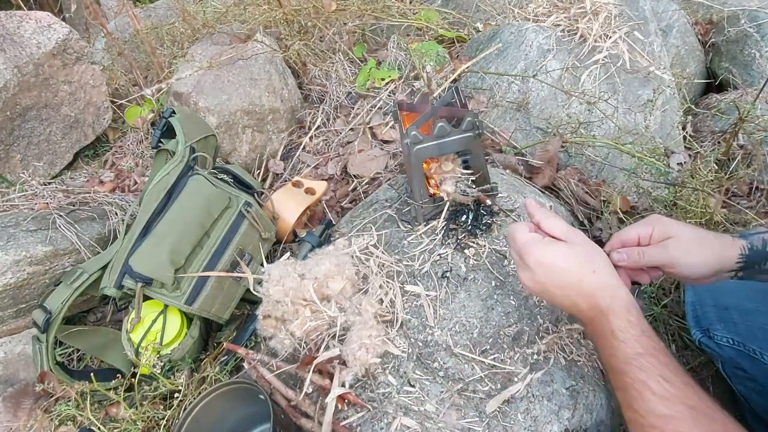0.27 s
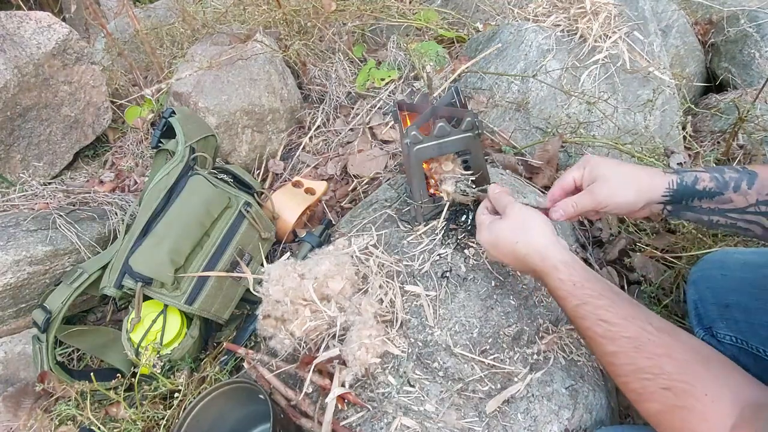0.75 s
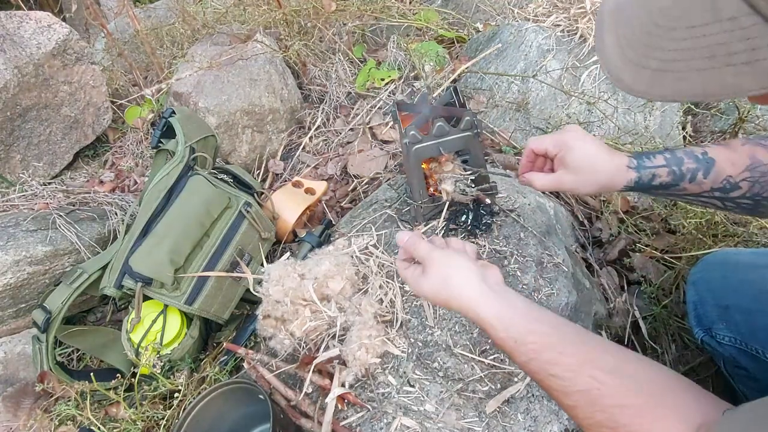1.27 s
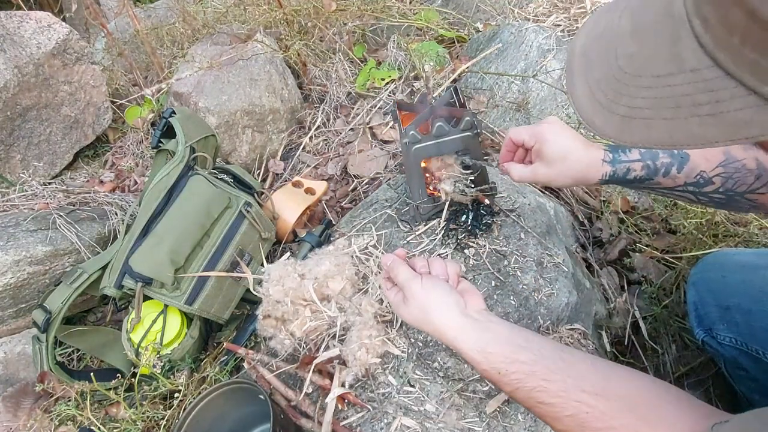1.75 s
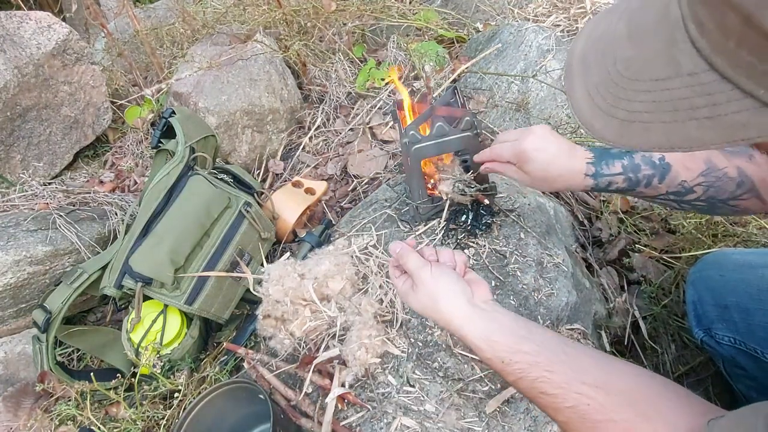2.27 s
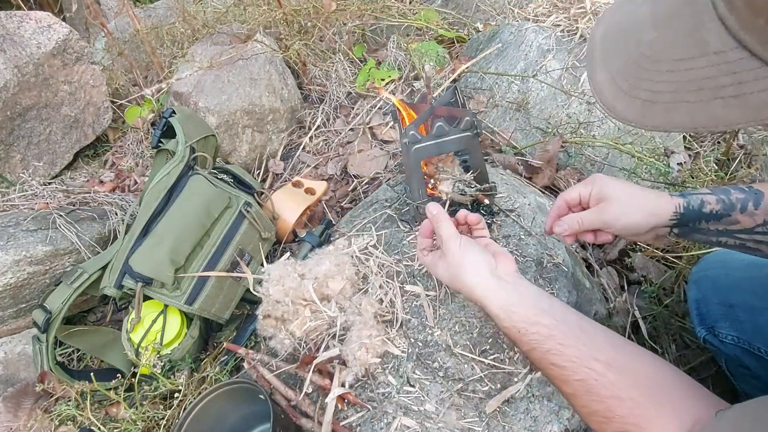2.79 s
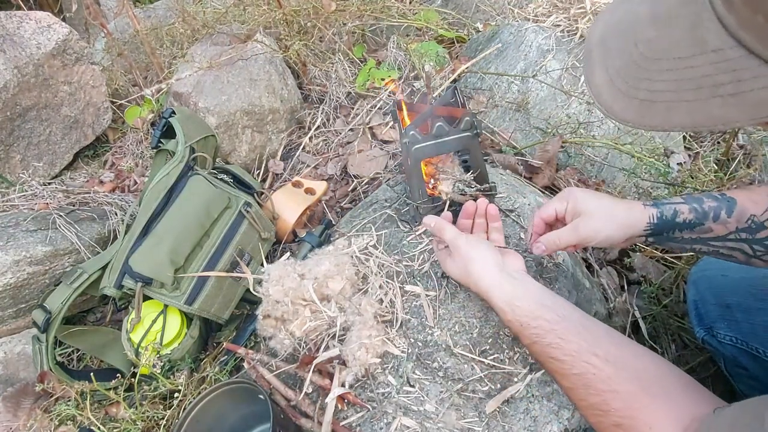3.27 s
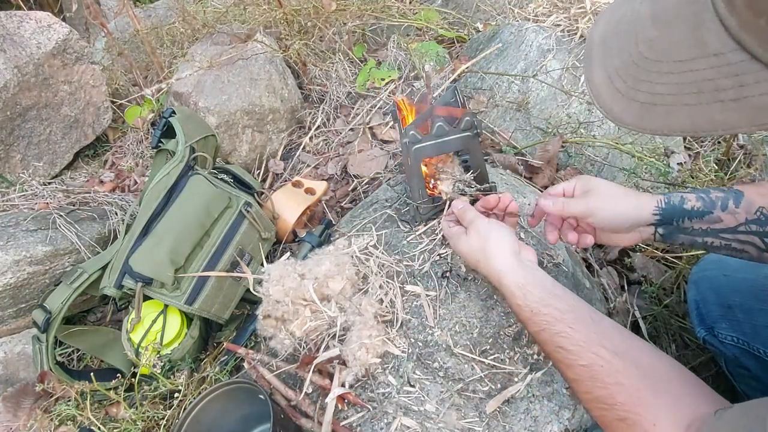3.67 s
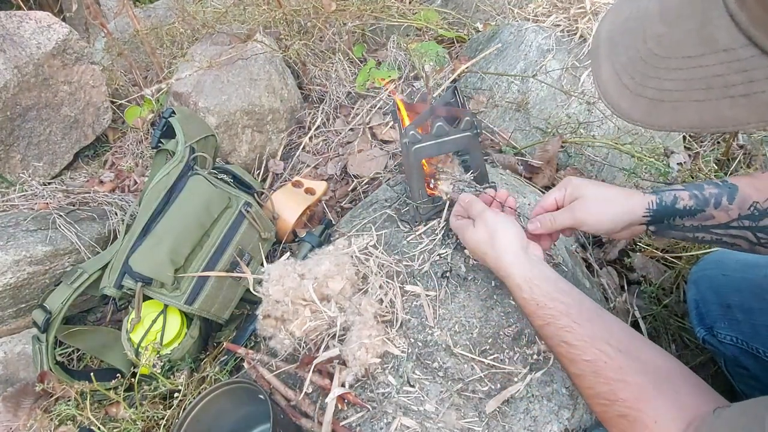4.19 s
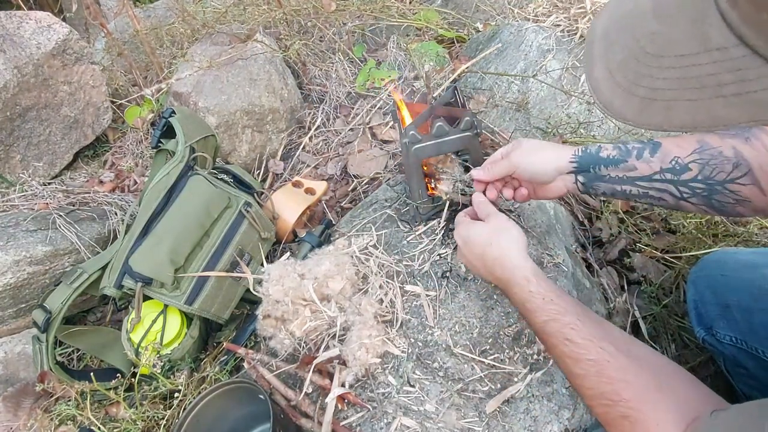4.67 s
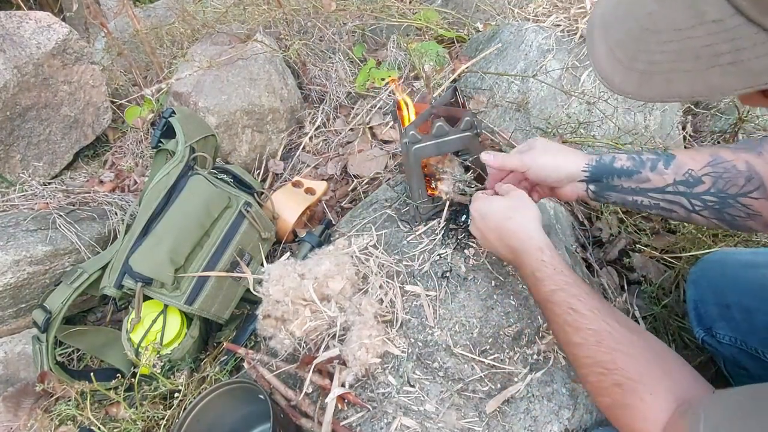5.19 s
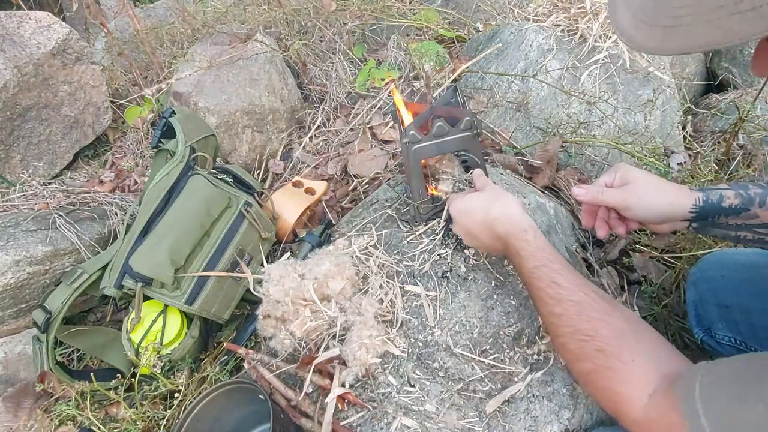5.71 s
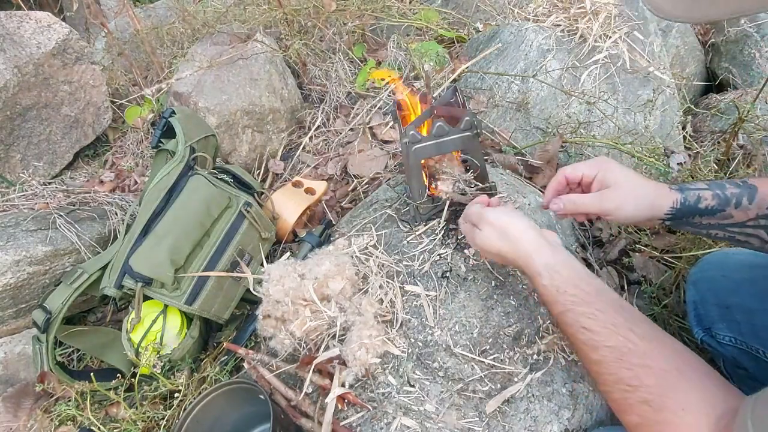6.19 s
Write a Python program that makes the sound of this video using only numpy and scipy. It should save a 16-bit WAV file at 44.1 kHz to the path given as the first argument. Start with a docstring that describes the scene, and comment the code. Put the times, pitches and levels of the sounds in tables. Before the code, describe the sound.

Loud brittle twig cracks open the scene, then rustling, small snaps and thin metallic scrapes follow above distant traffic rumble, with faint bird chirps.

```python
"""A low roar of far traffic and an engine's drone lie under dry twigs rustling in a pair of hands.
Twigs crack, and scrape and knock the sheet-steel mouth of a small wood stove; a boot scuffs, a small bird calls.
Roar, rustle, cracks and grit are coloured noise; noise rings the stove's modes; the engine adds a sine
to narrow hums, and the bird is a gliding sine with an echoing tail.
Two spaced microphones listen; the right one faces the hands."""
import sys
import numpy as np
from scipy import signal
from scipy.fft import rfft, irfft
from scipy.io import wavfile
from scipy.ndimage import uniform_filter1d

SR = 44100
rng = np.random.default_rng(int(sys.argv[2]) if len(sys.argv) > 2 else 0)


def materialize(psi):
    """Save the field psi as 16-bit PCM at rate SR to the path in sys.argv[1].

    A 1-D psi becomes a single channel; in a 2-D psi each row is a channel.
    """
    bounded = np.clip(np.atleast_2d(psi).T, -1, 1)
    quanta = np.round(bounded * 32767).astype(np.int16)
    wavfile.write(sys.argv[1], SR, quanta)


N = 284445  # length in samples

# All levels are set ahead of the microphones' own colour.
# spectrum of far traffic and air: [f/Hz, level per Hz/dB]
ROAR_SPECTRUM = [(15, -42.5), (25, -11.5), (65, -5.5), (92, -7.5), (114, -11), (225, -21.5), (304, -16.5),
                 (398, -23.5), (552, -18), (851, -15), (1870, -28), (2970, -51), (6010, -65.5),
                 (13900, -53.5), (16400, -60)]
# likeness of the roar at the two microphones: [f/Hz, common share/1]
ROAR_COMMON = [(60, 0.82), (300, 1), (700, 0.52), (1500, 0.28), (3000, 0.6), (9000, .1)]
# fuzzy hums beside the engine tone: [t/s, level near 68 Hz/dB, near 107 Hz/dB, near 135 Hz/dB]
HUM_LEVELS = [(0.0, -56.5, -66, -54), (0.27, -51, -49.5, -60), (1.58, -54, -67.5, -55),
              (2.53, -44, -51, -58), (2.71, -66, -48, -57), (2.93, -45, -58, -51.5), (6.12, -55, -62, -64),
              (6.34, -45, -60, -57), (6.45, -50, -69.5, -70)]
# filter bands of those hums: [f/Hz, width of one filter pass/Hz]
HUM_FILTERS = [(68, 5), (107, 7.7), (135, 16)]
# a faint higher hum that shifts and wavers: [t/s, f/Hz, level/dB]
HIGH_HUM = [(0, 281, -66), (.35, 294.4, -70), (.5, 334, -63.5), (1.1, 340.8, -65.5), (1.8, 326.2, -70.5),
            (2.3, 332.8, -58.5), (2.8, 338, -74), (3.9, 297, -78), (4.15, 292.3, -63), (4.6, 302.7, -65.5),
            (5.15, 300.3, -59), (5.7, 307.6, -69.5), (6.0, 306.7, -75.5), (6.45, 304.6, -59)]
# bird notes: [start t/s, length/s, from f/Hz, to f/Hz, level/dB, share before the peak/1, left-right/dB]
BIRD_NOTES = [(2.075, .045, 6960, 7560, -65.5, 0.54, -12), (2.776, .047, 6470, 7100, -74, 0.36, -9),
              (3.15, 0.037, 6500, 7440, -48, 0.68, -2.5), (3.183, 0.012, 7100, 4000, -61, 0.23, 5),
              (3.242, .048, 6540, 7370, -73, 0.19, -9), (3.297, .035, 4830, 4120, -77, .15, 4),
              (3.46, .0065, 7300, 4850, -56.5, 0.31, 0), (3.486, 0.052, 6900, 7700, -67.5, 0.54, -9),
              (3.959, 0.061, 6320, 7730, -51, .5, -5), (4.51, 0.053, 6840, 7600, -82, .3, -9)]
# boot on grit: [start t/s, rise/s, hold/s, fall/s, grit level/dB, thud level/dB]
BOOT_SCUFFS = [(1.317, .02, 0.053, .01, -50, -68), (1.383, 0.0027, .035, .11, -41.5, -39.5),
               (1.602, .012, .03, .03, -68.5, -50.5)]
# spectrum of the crunching grit: [f/Hz, level per Hz/dB]
GRIT_SPECTRUM = [(710, -3), (1200, -8), (1470, -29), (1650, -17), (2080, -14.5), (4010, -5), (5850, -13.5),
                 (9000, -16.5), (11700, -53), (19800, -120)]
# resonances of the thud: [f/Hz, width/Hz, relative level/dB]
THUD_MODES = [(257, 78, 5.5), (438, 270, -0.5), (690, 140, 1), (933, 52, 0)]
# the sole catches and squeaks: [start t/s, length/s, f/Hz, width of one filter pass/Hz, level/dB]
SOLE_SQUEAKS = [(1.346, .022, 8350, 370, -41), (1.343, 0.024, 12500, 900, -46),
                (1.362, .026, 7350, 1500, -38.5), (1.387, .01, 11300, 700, -42)]
# fingers moving among twigs: [t/s, level/dB]
HANDLING_LEVEL = [(0.0, -69), (0.41, -65), (1.09, -64), (1.3, -81), (1.52, -67.5), (1.88, -74),
                  (2.2, -68.5), (2.6, -71), (2.9, -75), (3.36, -71.5), (3.75, -74), (4.67, -79.5),
                  (5.17, -72), (5.64, -65.5), (5.86, -76), (6.03, -72), (6.12, -63), (6.21, -61.5),
                  (6.27, -68.5), (6.45, -65.5)]
# spectrum of the rustle: [f/Hz, level per Hz/dB]
RUSTLE_SPECTRUM = [(1500, -20), (3000, -10), (4500, -2), (7000, -3), (10000, -2.5), (13000, 3), (16000, -3)]
# modes of the sheet steel: [f/Hz, width before damping/Hz, relative level/dB]
STOVE_MODES = [(1260, 120, 0.5), (1556, 130, 1.5), (2830, 52, 1.5), (3227, 64, -2.5), (3920, 54, -4.5),
               (5040, 42, -16), (5600, 25, -28), (7070, 110, -23), (7900, 220, -4), (9270, 180, 0),
               (11300, 230, 4), (12260, 300, 0), (13600, 350, 6)]
# twigs dragged over the stove: [start t/s, rise/s, hold/s, fall/s, ring level/dB,
# hiss against the ring/dB, widening of the modes under the fingers/1]
STOVE_SCRAPES = [(2.068, 0.097, .06, 0.072, -52.5, -14, 6.6), (2.281, 0.0038, 0.0092, 0.097, -56, 2.5, 2.5),
                 (4.77, 0.025, 0.0079, 0.23, -75, 2.5, 4.5), (4.891, 0.052, 0.021, 0.066, -68.5, -6, 4.5),
                 (5.339, 0.0091, 0.05, 0.035, -66.5, -24, 3.6), (5.509, 0.0089, 0.009, 0.06, -59, -2, 2.1),
                 (5.571, .03, .045, .07, -54.5, -3, 4), (5.724, 0.011, .045, 0.068, -66, 0.5, 1.6)]
# twig ends knocking the stove: [t/s, peak level/dB, favoured f/Hz, level of the low modes/dB]
STOVE_KNOCKS = [(2.1671, -40.5, 3030, -11), (2.2874, -32, 3500, -24), (4.9376, -45.5, 2720, 2.5),
                (5.52, -41, 2660, -2), (5.5692, -33.5, 4140, -5.5), (5.6052, -33.5, 3300, -7),
                (5.628, -38.5, 2730, -14), (5.734, -53, 2730, -3), (5.7544, -50.5, 2800, -5)]
# twig cracks: [t/s, peak level before panning/dB, tone near 5 kHz/dB, tone at 14 kHz/dB, left-right/dB]
TWIG_CRACKS = [(0.1479, -25.5, -14, -2.5, -3), (0.182, -4.5, -3.5, 5.5, -2.5), (0.2441, -11, 5, 9.5, -1.5),
               (0.5237, -43, 0, -2, -4), (0.6344, -27, 8, 17.5, 2), (0.6709, -42, 10, 6, -4),
               (1.041, -39.5, 2, 0, -3), (1.0814, -35, 5.5, 6.5, 0), (1.321, -39, 1.5, 4, 5),
               (1.389, -26, 1, 0, 2.5), (1.618, -41, -4, 1, 5.5), (1.6676, -33.5, -3, 4.5, 4),
               (1.695, -47, 7, 5, 5), (1.708, -38, 1, 9, 4.5), (1.8349, -39.5, -16, 1, 1.5),
               (2.022, -36.5, -14, 0, 1), (2.1705, -37, 1, -6, -6), (2.2873, -30, -13, -30, -6),
               (2.368, -42, -16, 0, 1), (2.393, -42, -1, 10, 4), (2.4134, -40, -4, 10, -6),
               (2.4244, -42, -3, 0, 2), (2.446, -56, -8, 5, 2), (2.464, -44, -3, 4, 6),
               (2.5526, -31, -4, 10, -3.5), (2.6232, -40, -7, 2, -2), (2.9064, -41, -10, 5, -4),
               (3.117, -42.5, -15, 0, -5), (3.2106, -41, -6, 0, -1), (3.26, -50, -10, 2, 2),
               (3.296, -50, -4, 0, 1.5), (3.468, -42, 0, 0, 0), (3.5523, -49, -8, -5, 0),
               (3.5713, -41, -6, -3, -1), (3.7329, -41, -3, 2, 4.5), (3.9687, -36, -16, 9, 3),
               (4.267, -47, -26, 2, 0), (4.3217, -37, -14, 1, 1), (4.6349, -44, -7, 3, -2),
               (5.477, -39.5, 3, 4, 6), (5.8667, -47, -2, 0, 0), (6.007, -42.5, -16, -1, -6),
               (6.103, -43, -8, -1, -7), (6.1853, -41, -12, 4, 1), (6.2527, -42.5, -5, 2, 5.5),
               (6.2796, -42, -8, 2, 3.5), (6.293, -37, -5, 2, 0), (6.3155, -45, -15, -1, 2.5),
               (6.3364, -44, -11, 0, 3.5), (6.369, -37.5, -17, -1, -4), (6.394, -44, -9, -4, 3),
               (6.423, -43, -7, 2, 3)]

ROAR_DB = -48
DRONE_HZ, DRONE_DB, RECEDE_DB_PER_S = 86.85, -45.5, 0.35  # main engine tone, slowly fainter
GLIDE_BEND, NOTE_START_DB, NOTE_END_DB = 2.32, -13, -14  # the glide slows as it goes; ends of a note
SCUFF_START_DB, SCUFF_END_DB, SAND_DB, THUD_LAG_S = -18, -43.5, -3.5, .004
TICKS_PER_S, TICK_SPREAD_DB = 250, 4  # tiny ticks in the rustle
DRAG_START_DB, DRAG_END_DB, HISS_FOLLOWS = -12, -25.5, 0.81  # ends of a drag; hiss swells less than ring
CONTACT_T60_S = 0.027  # decay of the noise that drives a knock
TEAR_S, TEAR_LOUD_S = .0012, .004  # tearing time; a full-scale break tears this much longer
# small cracks at random: rate at the mean handling level in dB, centre and spread of level, tone near 5 kHz
SNIPS_PER_S, SNIP_DB, SNIP_SPREAD_DB, SNIP_MID_DB = 37, -56, 4, -14.5
EDGE_HZ = 15950  # upper band limit


def amp(db):
    """Turns dB into a gain."""
    return 10 ** (np.asarray(db) / 20)


def evened(x):
    """Brings a sound to an RMS of one."""
    return x / np.sqrt(np.mean(x ** 2) + 1e-20)


def read(points, hz):
    """Reads a curve with straight lines over log frequency."""
    f, value = np.transpose(points)
    return np.interp(np.log(hz + 1), np.log(f + 1), value)


def columns(rows):
    """Sample times of a table and its columns joined by straight lines."""
    s, *rest = np.transpose(rows)
    t = np.arange(round(s[0] * SR), min(round(s[-1] * SR), N)) / SR
    return t, [np.interp(t, s, c) for c in rest]


def add(mix, s, sound):
    """Lays a sound into the mix from time s, cut at the end of the mix."""
    part = mix[..., round(s * SR):][..., :sound.shape[-1]]
    part += sound[..., :part.shape[-1]]


def colour(x, points):
    """Filters by a spectrum in dB, then evens the level."""
    n = x.shape[-1]
    gain = amp(read(points, np.fft.rfftfreq(n, 1 / SR)))
    return evened(irfft(rfft(x) * gain, n))


def resonate(x, hz, width):
    """A resonance: shifts hz down to zero, smooths, and shifts back."""
    turn = np.exp(2j * np.pi * np.cumsum(hz * np.ones(x.shape[-1])) / SR)
    r = np.exp(-np.pi * width / SR)
    smooth = signal.lfilter([1 - r], [1, -r], x / turn + 1e-18)
    return 2 * (turn * smooth).real


def resonate_twice(x, hz, width):
    """Two passes of one resonance, for steeper skirts."""
    return resonate(resonate(x, hz, width), hz, width)


def pair(n, same):
    """Noise for both microphones, partly shared."""
    a, b = rng.standard_normal((2, n))
    same = np.clip(same, 0, 1)
    return np.array([a, same * a + np.sqrt(1 - same ** 2) * b])


def panned(db, pan_db):
    """Left and right gains, pan_db apart around db."""
    return amp([[db + pan_db / 2], [db - pan_db / 2]])


def grains(n, per_s, spread_db):
    """Random clicks, a few of them large."""
    size = amp(spread_db * np.minimum(rng.exponential(1, n), 5))
    return size * (rng.random(n) < per_s / SR)


def patchy(x, depth_db):
    """Uneven colour: random blotches of level a few milliseconds long and some hundred hertz wide."""
    z = signal.stft(x, nperseg=256)[2]
    blotches = uniform_filter1d(rng.standard_normal(z.shape[1:]), size=4, axis=0)
    blotches = uniform_filter1d(blotches, size=3, axis=1)
    z = z * amp(depth_db * evened(blotches))
    return evened(signal.istft(z, nperseg=256)[1][:, :x.shape[1]])


def swell_db(rise, hold, fall, start_db, end_db):
    """Attack, hold and release in dB under the peak."""
    t = np.arange(round((rise + hold + fall) * SR)) / SR
    return np.interp(t, [0, rise, rise + hold, rise + hold + fall], [start_db, 0, 0, end_db])


def traffic():
    """Patchy noise from the right: its shared part reaches the left microphone a little late."""
    frames, hz = N // 512 + 5, np.fft.rfftfreq(2048, 1 / SR)
    a, b, c, d, patches = rng.standard_normal((frames, 1025, 5)).T
    patches = evened(uniform_filter1d(uniform_filter1d(patches, 20, 0), 8, 1))
    same = np.clip(read(ROAR_COMMON, hz), 0, 1)[:, None]
    right = a + 1j * b
    late = np.exp(-2j * np.pi * hz * 0.00038)[:, None]  # delay in seconds
    left = same * right * late + np.sqrt(1 - same ** 2) * (c + 1j * d)
    z = np.array([left, right]) * amp(read(ROAR_SPECTRUM, hz)[:, None] + 1.43 * patches)
    return amp(ROAR_DB) * evened(signal.istft(z, nperseg=2048, noverlap=1536)[1][:, :N])


def engine():
    """A steady-pitched tone and narrow bands of noise that beat against it."""
    t = np.arange(N) / SR
    level = np.sqrt(2) * amp(DRONE_DB - RECEDE_DB_PER_S * t)
    out = level * np.sin(2 * np.pi * DRONE_HZ * t + np.array([[0], [.3]]))
    t, levels = columns(HUM_LEVELS)
    for (hz, width), db in zip(HUM_FILTERS, levels):
        hum = resonate_twice(pair(len(t), 0.92), hz, width)
        add(out, t[0], amp(db) * evened(hum))
    t, (hz, db) = columns(HIGH_HUM)
    add(out, t[0], amp(db) * evened(resonate_twice(pair(len(t), 1.0), hz, 6)))
    return out * amp([[-.4], [.4]])  # a touch to the right


def whistle(length, from_hz, to_hz, peak):
    """A slightly hoarse glide with a faint partial an octave below."""
    rise, fall = peak * length, max(1 - peak, .05) * length
    shape_db = swell_db(rise, 0, fall, NOTE_START_DB, NOTE_END_DB)
    u = np.linspace(0, 1, len(shape_db))
    glide = (1 - np.exp(-GLIDE_BEND * u)) / (1 - np.exp(-GLIDE_BEND))
    hz = from_hz + (to_hz - from_hz) * glide
    hoarse = evened(uniform_filter1d(rng.standard_normal(len(u)), 60))
    phase = 2 * np.pi * np.cumsum(hz * (1 + 0.0058 * hoarse)) / SR
    tone = np.sin(phase) + amp(-30) * np.sin(phase / 2)
    return np.sqrt(2) * amp(shape_db) * tone * signal.windows.tukey(len(u), .2)


def bird():
    """Thin gliding whistles with a diffuse tail from the trees."""
    dry = np.zeros((2, N))
    for s, length, from_hz, to_hz, db, peak, pan_db in BIRD_NOTES:
        add(dry, s, whistle(length, from_hz, to_hz, peak) * panned(db, pan_db))
    t = np.arange(SR // 2) / SR
    decay = amp(-60 * t / 0.12) + amp(-16 - 60 * t / .5)
    tail = rng.standard_normal((2, len(t))) * decay * np.minimum(t / 0.0059, 1)
    tail /= np.linalg.norm(tail[0])
    tail[:, 0] = 1  # the direct sound
    return signal.fftconvolve(dry, tail, axes=1)[:, :N]


def boot():
    """Grit crunches as patchy noise, the ground thuds in low modes and the sole squeaks in narrow bands."""
    out = np.zeros((2, N))
    for s, rise, hold, fall, grit_db, thud_db in BOOT_SCUFFS:
        shape_db = swell_db(rise, hold, fall, SCUFF_START_DB, SCUFF_END_DB)
        n = len(shape_db)
        bumps = evened(uniform_filter1d(grains(n, 160, 4.2), 110))
        crunch = patchy(pair(n, 0.61) * (1 + 0.19 * bumps), depth_db=4.0)
        sand = colour(crunch, [(6000, -15), (9000, -7.5), (16000, -5)])
        thud = evened(sum(amp(g) * evened(resonate(crunch, f, w)) for f, w, g in THUD_MODES))
        fade = signal.windows.tukey(n, .04)
        grit = colour(crunch, GRIT_SPECTRUM) + amp(SAND_DB) * sand
        add(out, s, amp(grit_db + shape_db) * grit * fade)
        add(out, s + THUD_LAG_S, amp(thud_db + .6 * shape_db) * thud * fade)
    for s, length, hz, width, db in SOLE_SQUEAKS:
        n = round(length * SR)
        squeak = resonate_twice(pair(2048, 0.32), hz, width)[:, -n:]  # skip the filter's build-up
        add(out, s, amp(db) * evened(squeak) * signal.windows.tukey(n, .7))
    return out


def rustle():
    """Hiss of dry bark with tiny ticks in it."""
    t, (db,) = columns(HANDLING_LEVEL)
    puff = np.exp(-np.arange(200) / (0.00077 * SR))
    clicks = grains(len(t), TICKS_PER_S, TICK_SPREAD_DB)
    ticks = evened(signal.oaconvolve(clicks, puff)[:len(t)])
    hiss = pair(len(t), 0.1) * (1 + 0.75 * ticks)
    out = np.zeros((2, N))
    add(out, t[0], amp(db) * colour(hiss, RUSTLE_SPECTRUM))
    return out


def steel(drive, damping, favoured):
    """The modes of the stove; the spot touched favours some, given as (Hz, dB)."""
    return evened(sum(amp(g + read(favoured, hz)) * evened(resonate(drive, hz, damping * w))
                      for hz, w, g in STOVE_MODES))


def stove():
    """Uneven slips of bark ring the steel with a dry hiss above; knocks ring it freely."""
    out = np.zeros((2, N))
    slip_decay = np.exp(-np.arange(400) / (0.0046 * SR))
    hiss_tone = [(1500, 8.5), (2600, 1), (4500, 7.0), (6500, 5.5), (9000, 6.0), (13000, 0.0), (16000, -6)]
    for s, rise, hold, fall, db, hiss_db, damping in STOVE_SCRAPES:
        shape_db = swell_db(rise, hold, fall, DRAG_START_DB, DRAG_END_DB)
        n = len(shape_db)
        slips = 1 + 0.29 * evened(signal.oaconvolve(grains(n, 200, 4.9), slip_decay)[:n])
        drive = patchy(pair(n, 0.43) * slips, depth_db=-3.5) * signal.windows.tukey(n, .04)
        hiss = colour(drive, hiss_tone)
        ring = steel(drive, damping, [(1600, -3.5), (2700, 1.0), (5000, 11), (9000, -30)])
        drag = amp(shape_db) * ring + amp(hiss_db + HISS_FOLLOWS * shape_db) * hiss
        add(out, s, amp(db) * drag)
    t = np.arange(4096) / SR
    for s, db, hz, low_db in STOVE_KNOCKS:
        favoured = [(1600, low_db), (0.87 * hz, -8), (hz, 0), (1.1 * hz, -8), (9000, -13), (13000, -17)]
        contact = pair(len(t), 0.68) * amp(-60 * t / CONTACT_T60_S)
        ring = steel(contact, 0.49, favoured)
        add(out, s, amp(db) * ring / np.abs(ring).max())
    return out


def snips():
    """Small cracks at random moments, more where the fingers are busier."""
    s, db = np.transpose(HANDLING_LEVEL)
    candidates = round(3 * SNIPS_PER_S * N / SR)  # about one in three stays at the mean handling level
    when, keep, *size = rng.random((candidates, 6)).T
    when = when * (N / SR - .01) + 0.0025
    busy = amp(2.7 * (np.interp(when, s, db) - db.mean()))
    level, mid, top, pan = 2 * np.array(size) - 1
    rows = np.transpose([when, SNIP_DB + SNIP_SPREAD_DB * level, SNIP_MID_DB + 9 * mid,
                         1 + 4 * top, 1.5 + 4 * pan])
    return list(rows[3 * keep < busy])


def cracks():
    """A sharp first break, a few milliseconds of tearing fibres, then a faint return from the rocks."""
    out, t = np.zeros((2, N)), np.arange(-64, 4032) / SR
    for s, db, mid_db, top_db, pan_db in TWIG_CRACKS + snips():
        snap = amp(-60 * t / 0.0061)
        tearing = amp(-11) * np.exp(-(t / (TEAR_S + TEAR_LOUD_S * amp(0.56 * db))) ** 2)
        tail = amp(-21 - 60 * t / 0.031) + amp(-33.5 - 60 * t / 0.27)
        onset = np.clip((t - .0008) / 0.00023, 0, 1)
        burst = onset * (snap + tearing + tail)
        tone = [(600, mid_db - 18), (2200, mid_db - 11), (5200, mid_db),
                (7500, mid_db / 2 - 3.0), (9500, 0.0031), (14000, top_db)]
        sound = colour(pair(len(t), 0.34) * burst, tone)
        sound[0] = np.roll(sound[0], 5)  # samples: the left microphone is a little farther
        add(out, s + t[0], panned(db, pan_db) * sound / np.abs(sound).max())
    return out


def scene():
    """All layers, from the background to the breaking twigs."""
    return traffic() + engine() + bird() + boot() + rustle() + stove() + cracks()


def record(dry):
    """The left microphone is shaded from treble, the right faces it; both lose deep bass; then the band limit."""
    hz = np.fft.rfftfreq(N, 1 / SR)
    shade_db = read([(5000, 0), (8000, 2.0)], hz)
    bass_db = read([(18, -34.5), (42, -0.5)], hz)
    heard = irfft(rfft(dry) * amp([bass_db - shade_db, bass_db + shade_db]), N)
    band_limit = signal.firwin(127, EDGE_HZ, window=("kaiser", 9), fs=SR)
    return signal.oaconvolve(heard, band_limit[None], "same")


dry = scene()
out = record(dry)
materialize(out)
```